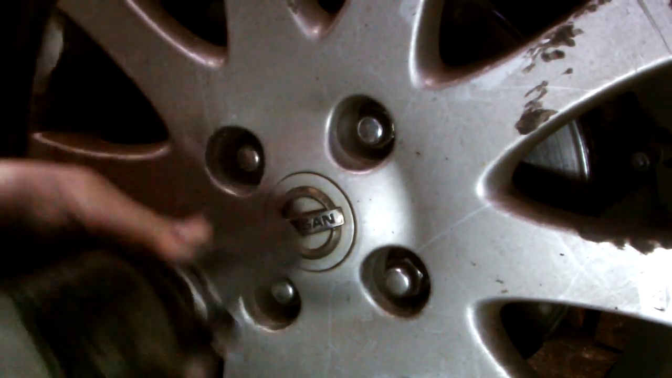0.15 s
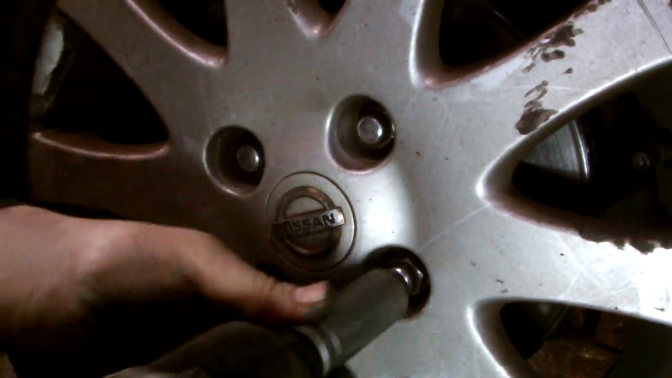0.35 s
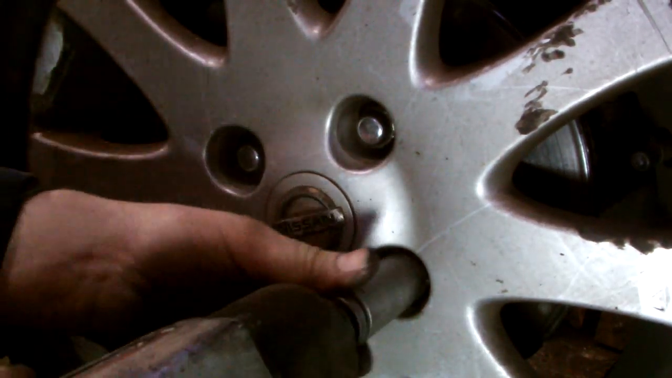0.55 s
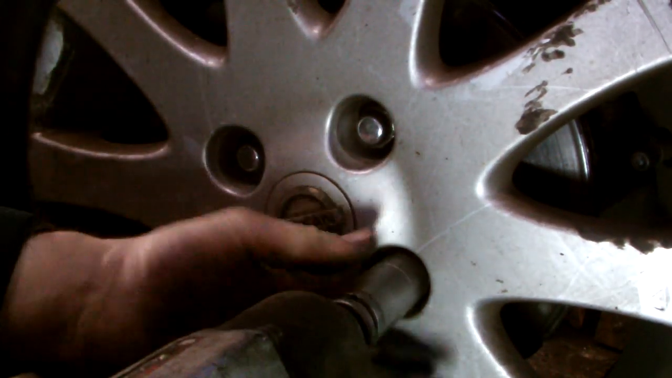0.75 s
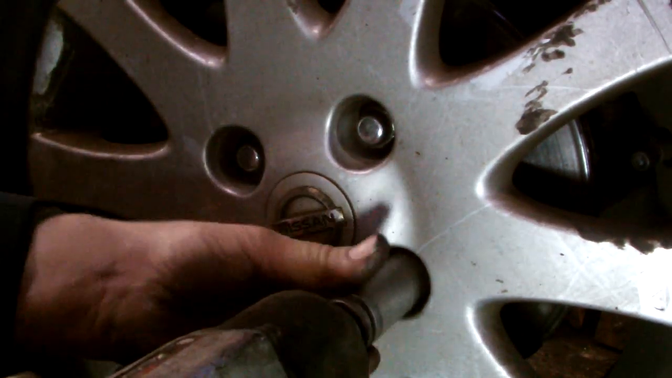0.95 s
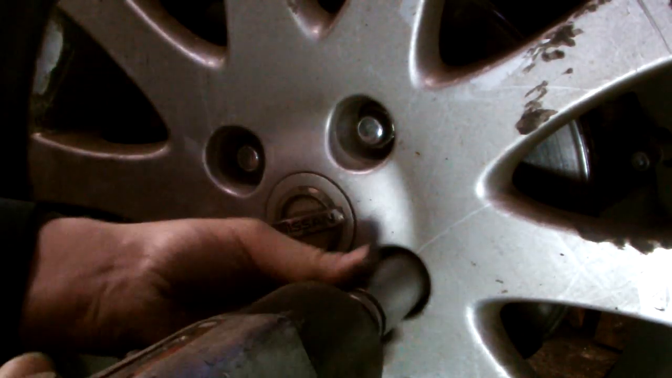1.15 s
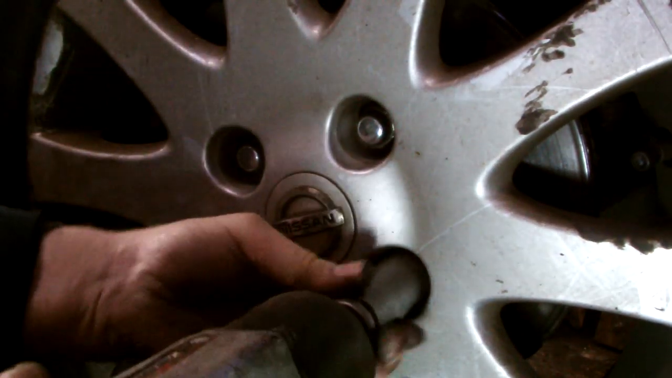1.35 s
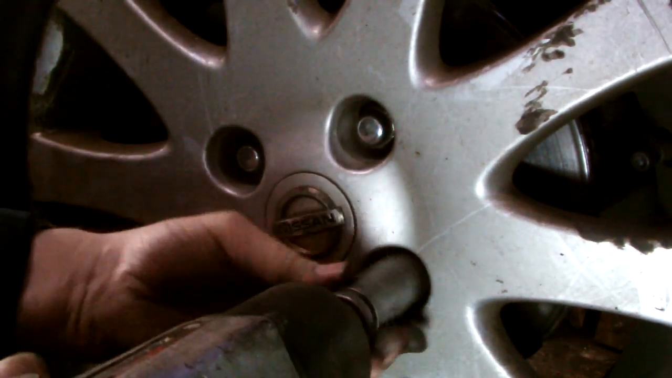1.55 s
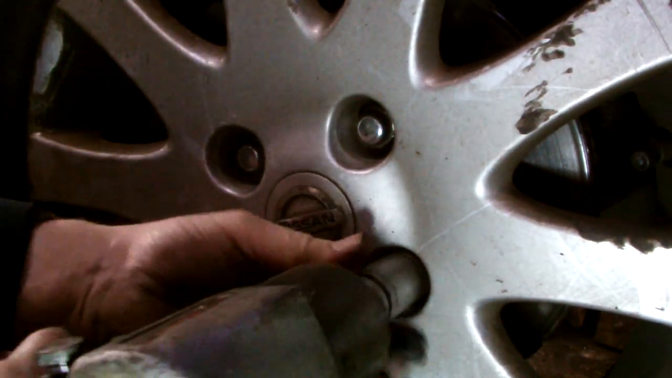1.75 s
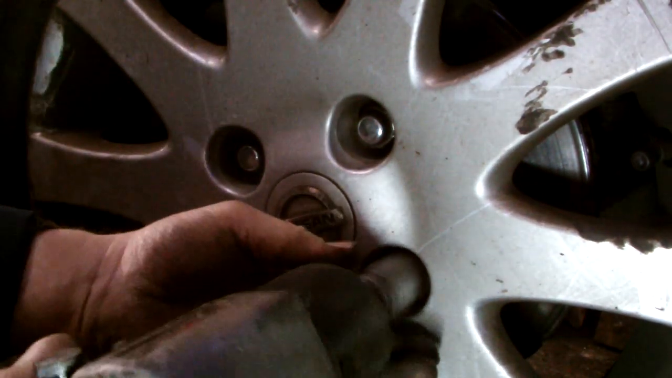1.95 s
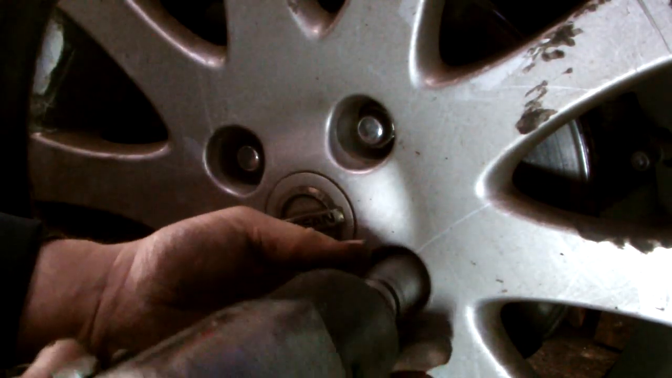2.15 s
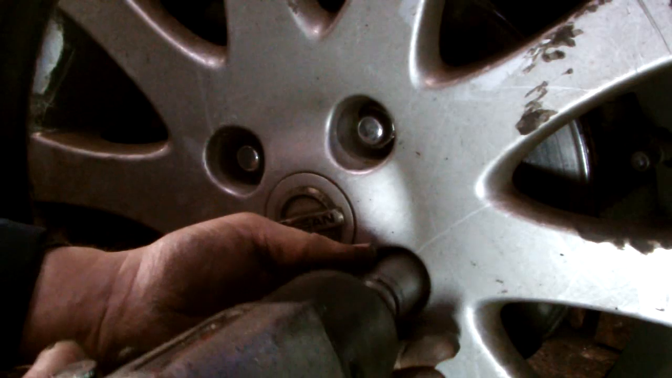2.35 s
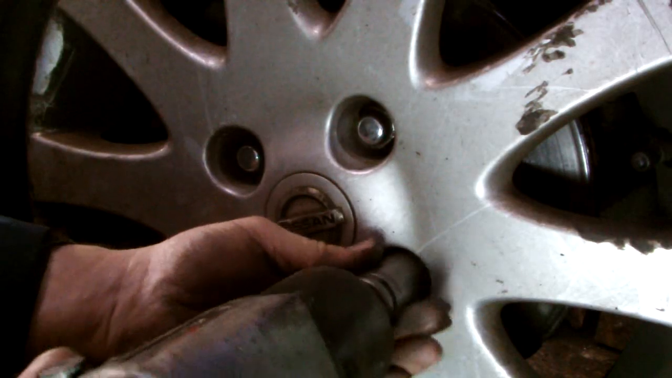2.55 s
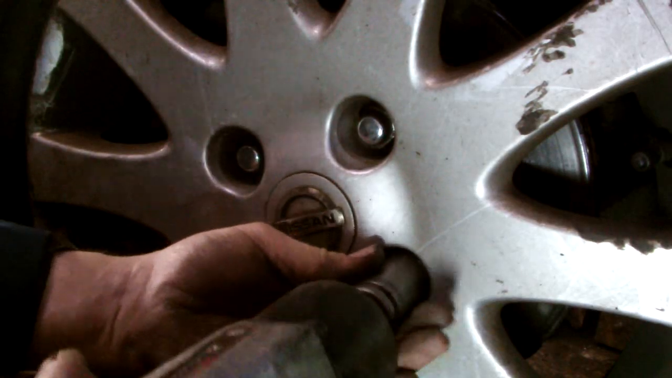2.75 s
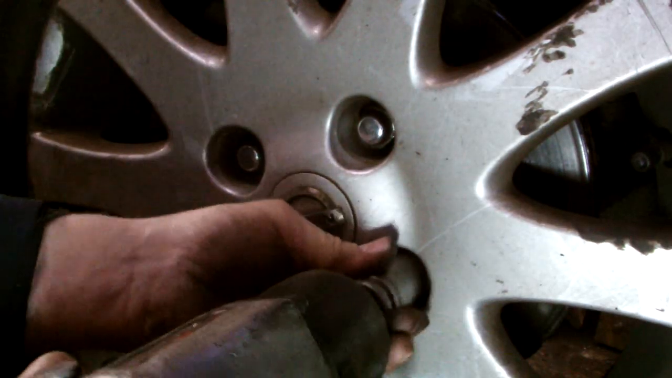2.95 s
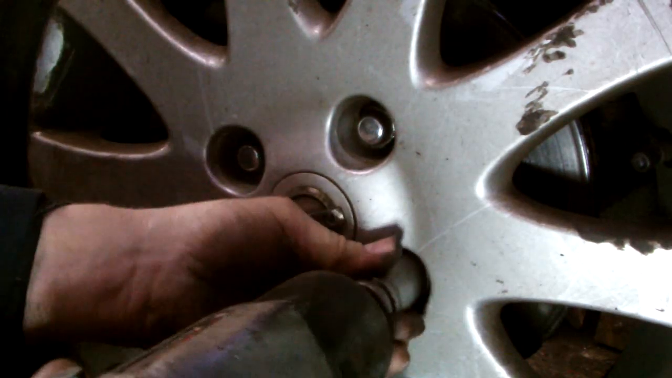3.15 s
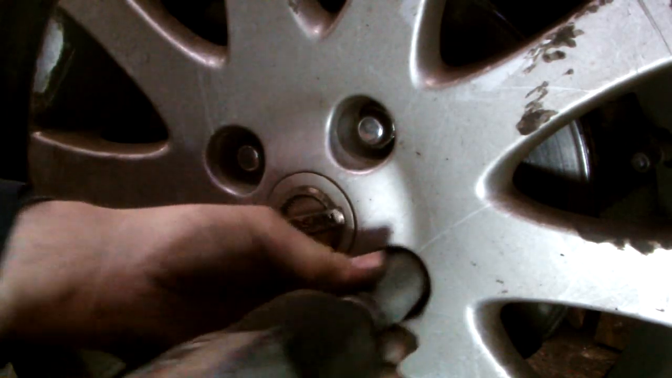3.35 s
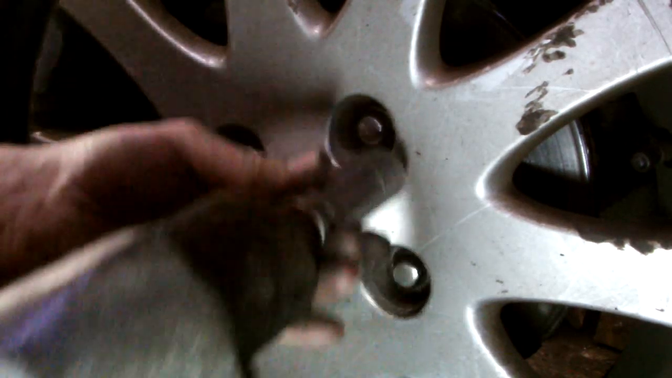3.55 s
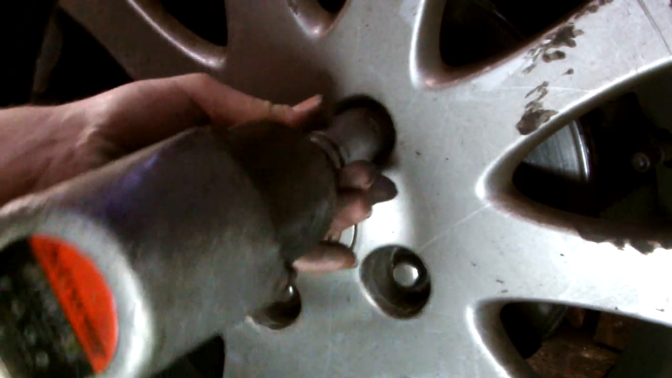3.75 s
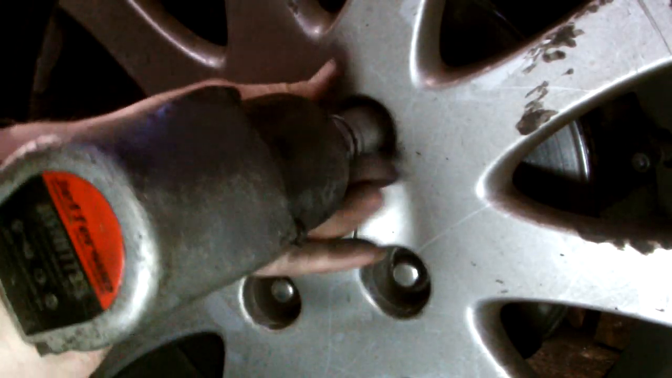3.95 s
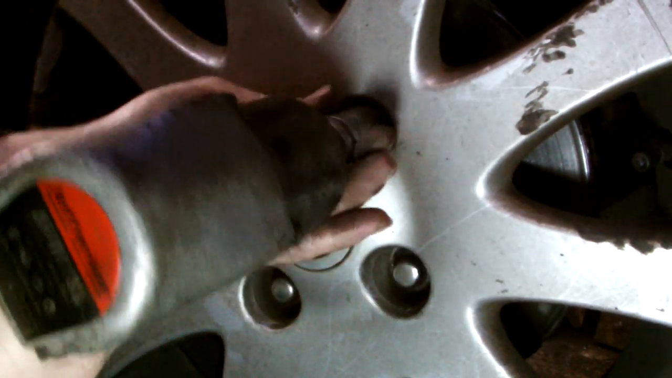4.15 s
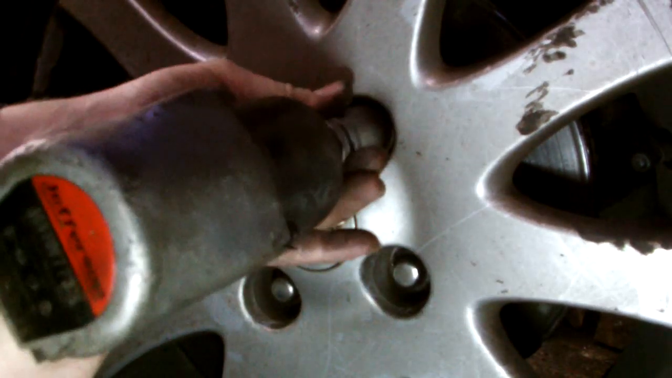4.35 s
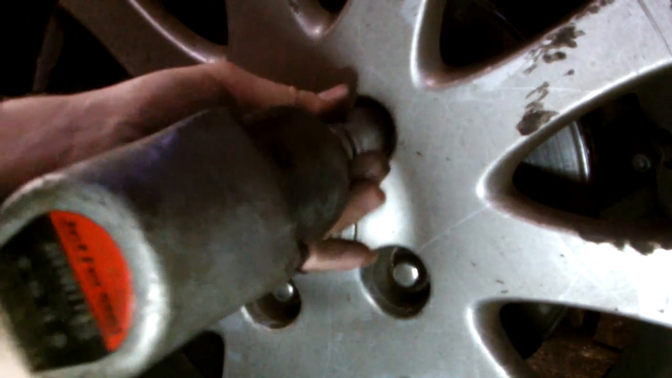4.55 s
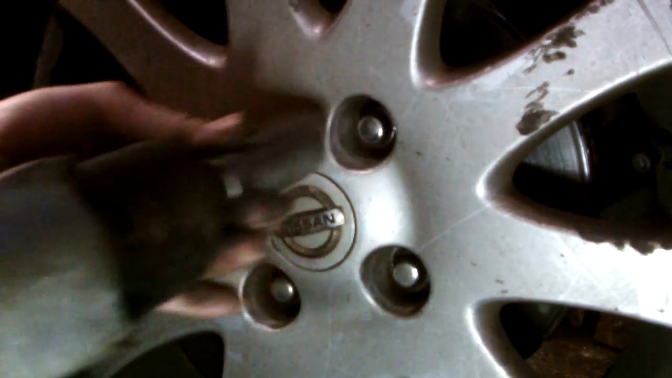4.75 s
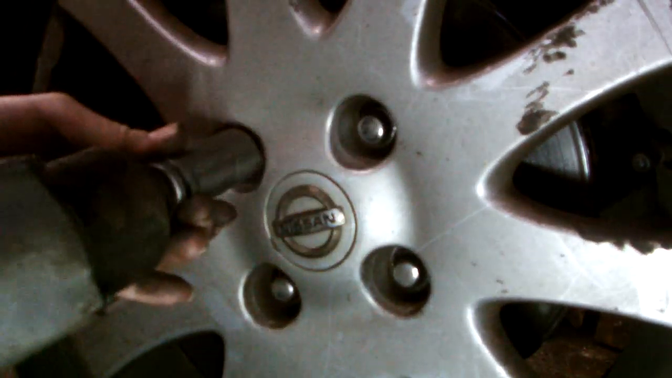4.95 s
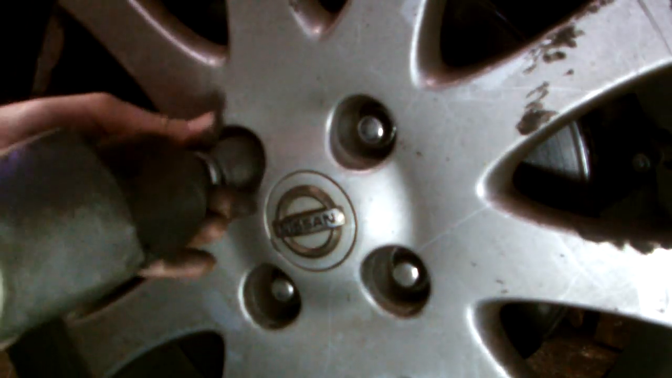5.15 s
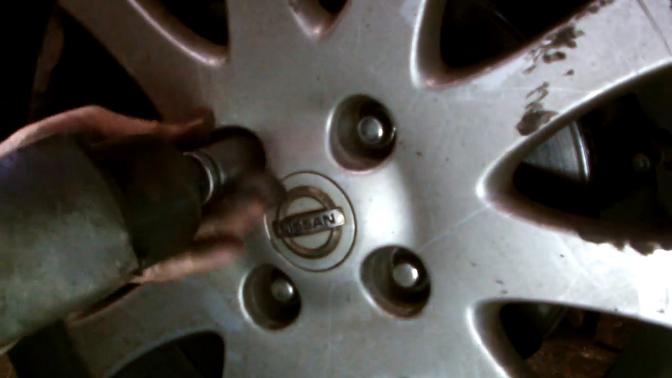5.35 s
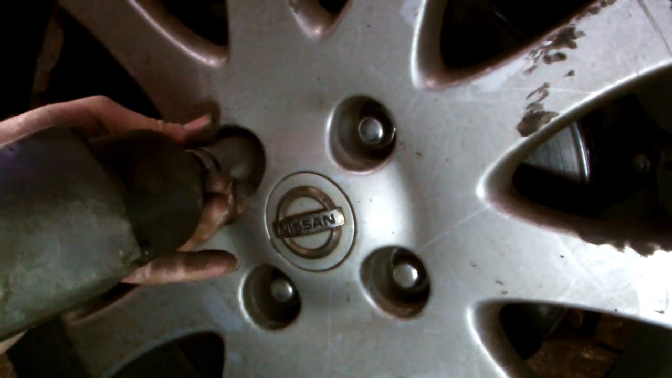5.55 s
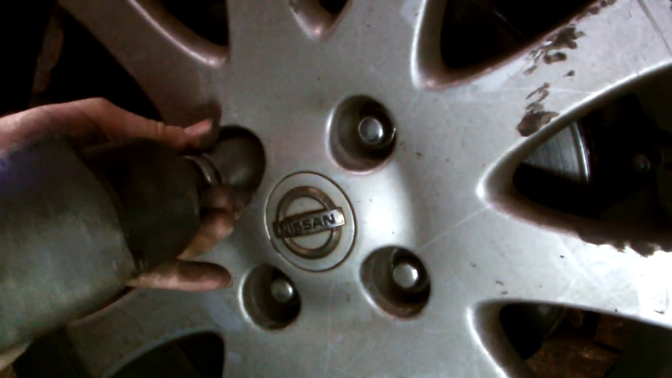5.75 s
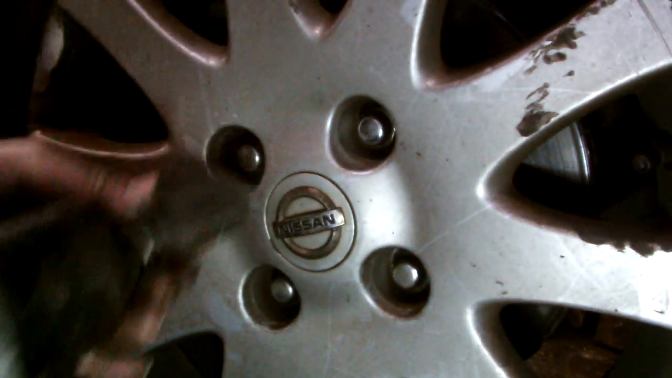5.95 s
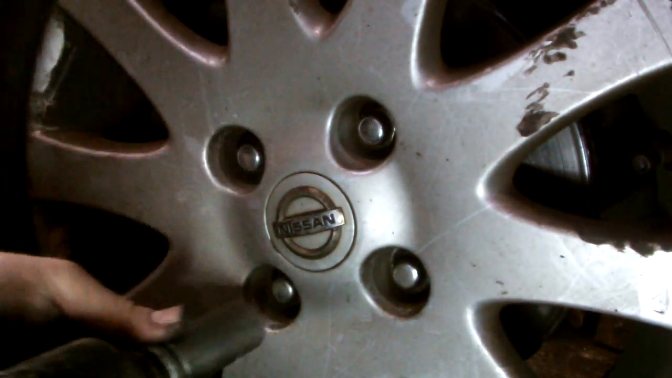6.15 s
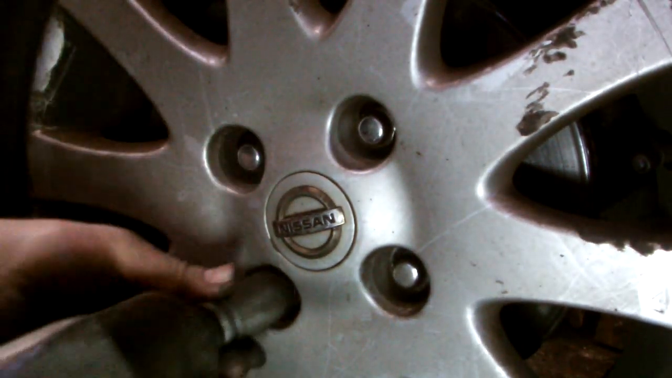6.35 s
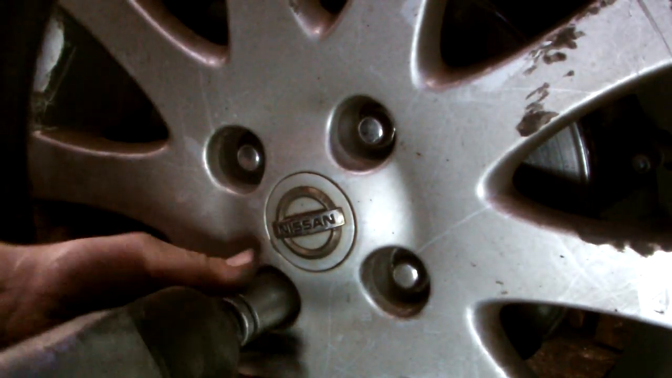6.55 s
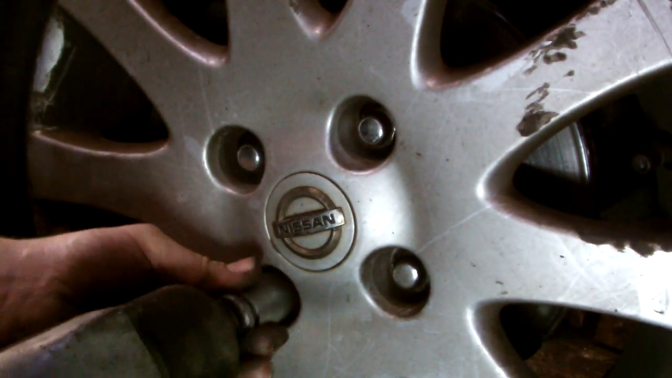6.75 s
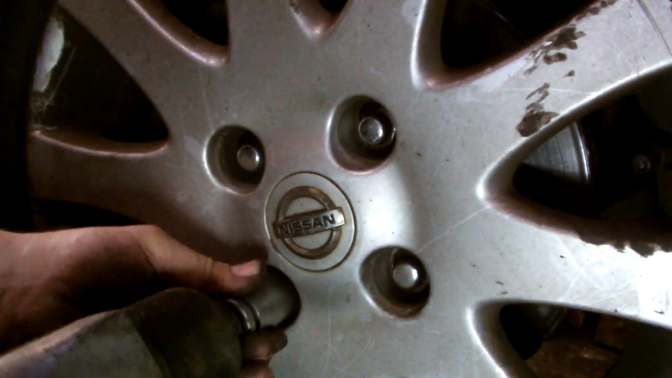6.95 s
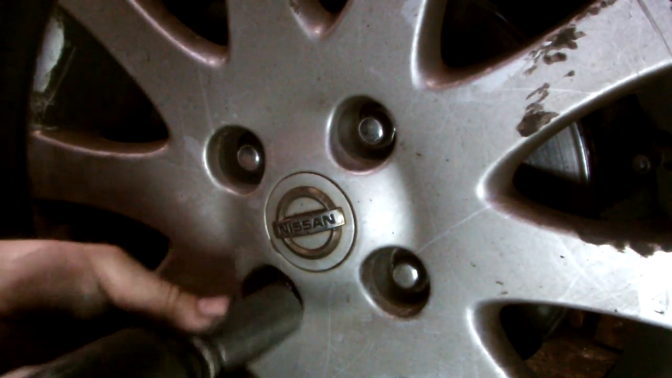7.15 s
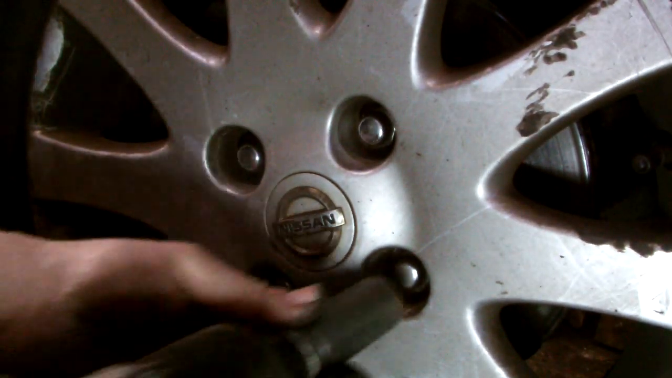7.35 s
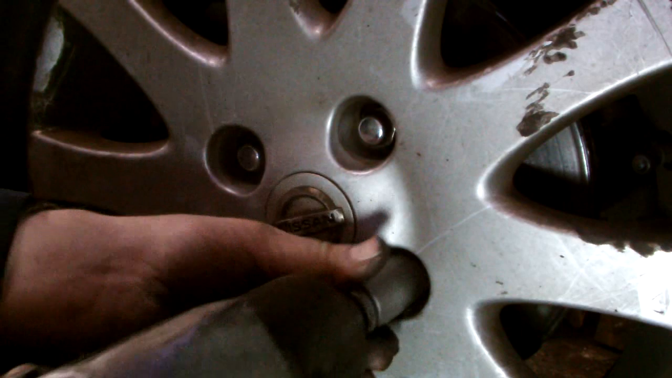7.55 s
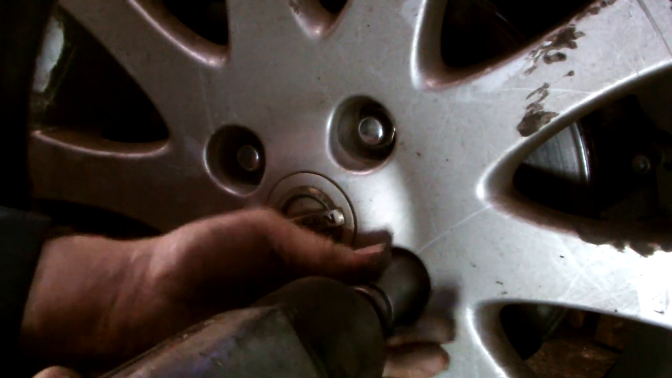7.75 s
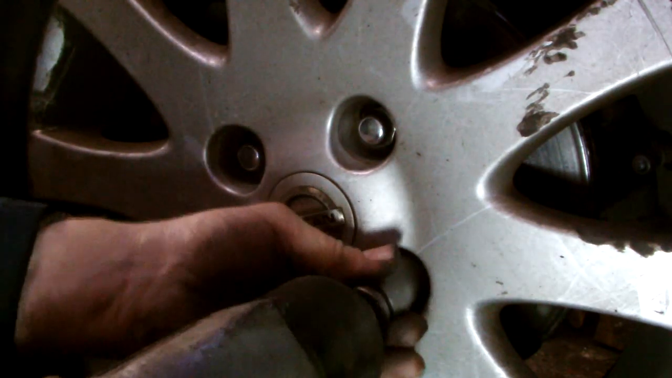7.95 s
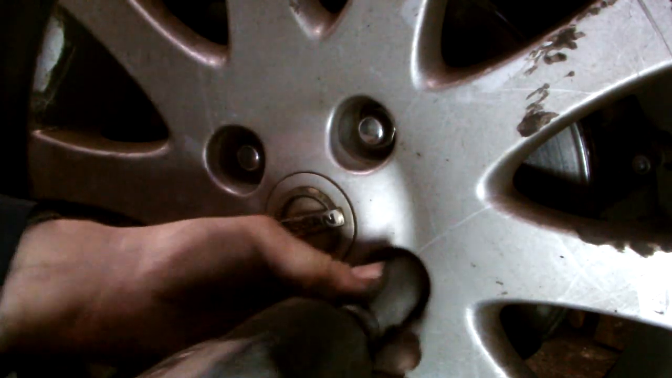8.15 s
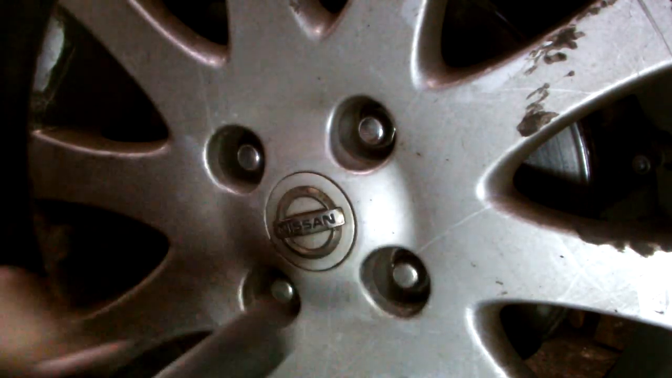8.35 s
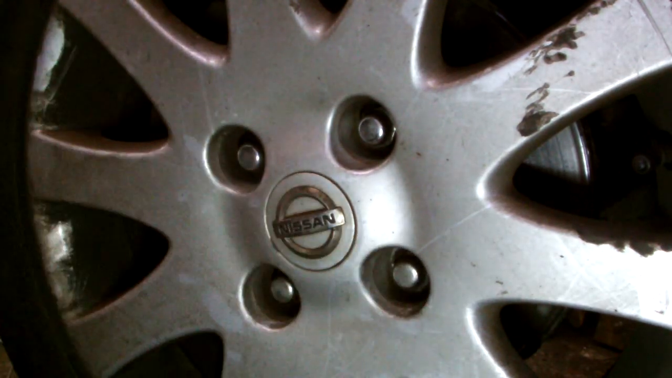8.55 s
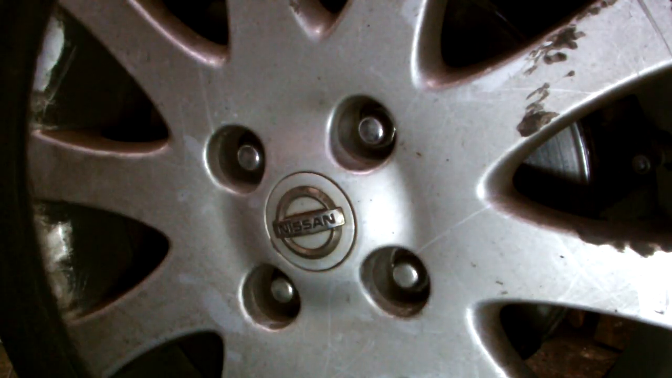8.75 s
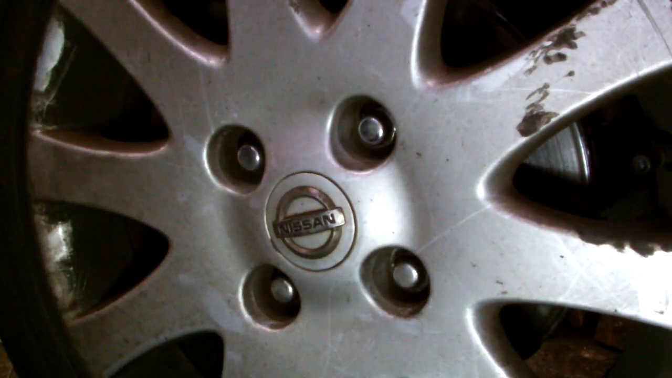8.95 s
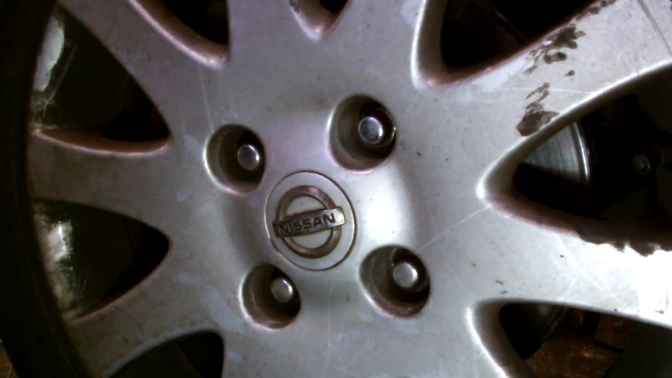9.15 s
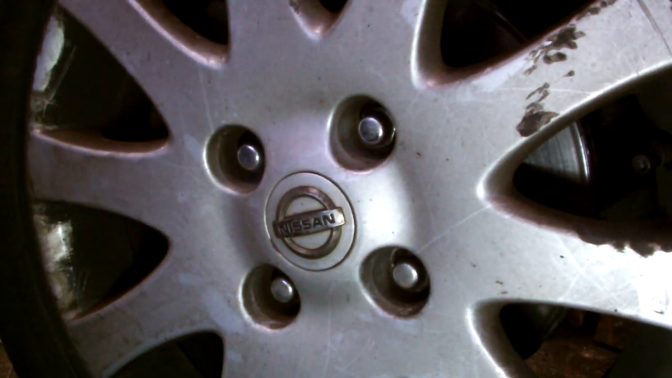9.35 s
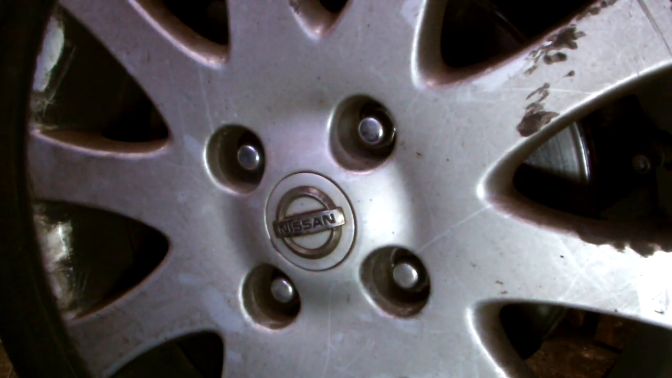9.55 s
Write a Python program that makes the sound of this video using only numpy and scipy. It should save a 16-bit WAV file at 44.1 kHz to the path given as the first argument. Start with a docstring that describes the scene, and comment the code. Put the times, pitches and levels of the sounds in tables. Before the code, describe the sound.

Close up in a hard-walled garage, the ring of an earlier burst dies away over a light metallic slip. From 0.5 s the socket knocks softly on a wheel nut, with thin air leak and dull hand scuffs. At 1.9 s comes a firm clack and two tiny puffs of the air wrench; from 2.2 to 3.3 s three bursts follow, first whirring up briefly, then hammering steel at about seventeen blows a second amid bright hiss and chatter. Clacks at 3.8-4.0 s lead to another burst at 4.2-4.55 s. The pattern repeats: knocks near 5.2 s, burst 5.5-5.8; knocks near 6.5, burst 6.8-7.0; knocks near 7.6, burst 7.9-8.1. Each of these four opens with a sharp howling rush of air and ends abruptly, echoing. After 8.5 s only faint taps, a scuff and a wavering air hiss remain over quiet workshop noise.

```python
"""A hard-walled garage, microphone close to a pneumatic impact wrench tightening the nuts of an alloy car wheel.
Knocks and clinks: short noise bursts and decaying steel modes, as the socket finds each nut.
Wrench: vane puffs and filtered hiss from the air motor; steel cracks about 17 times a second once a nut is
tight; ticks and squeaks of the loose socket between. Softer: filtered noise for the air leak, the wheel's
rumble, the hand and the workshop. Decaying noise makes the room ring on."""
import sys
import numpy as np
from scipy import signal
from scipy.fft import rfft, irfft
from scipy.io import wavfile

SR = 44100
rng = np.random.default_rng(int(sys.argv[2]) if len(sys.argv) > 2 else 0)


def inscribe(sig):
    """Save sig as 16-bit PCM at rate SR to the path in sys.argv[1].

    A 1-D sig is mono; a 2-D sig holds one channel per row.
    Samples are clipped to [-1, 1] before scaling.
    """
    pcm = np.round(np.clip(np.atleast_2d(sig).T, -1, 1) * 32767)
    wavfile.write(sys.argv[1], SR, pcm.astype(np.int16))


N = 424241
TIME = np.arange(N) / SR


def undb(db):
    """Decibels to gain."""
    return 10 ** (np.asarray(db) / 20)


def unit(x):
    """Scale to rms 1."""
    return x / np.sqrt(np.mean(x ** 2))


def along(points, hz):
    """Read (f/Hz, value) points on a log-frequency axis."""
    f, value = np.transpose(points)
    return np.interp(np.log(hz + 1), np.log(f), value)


def colour(x, points):
    """Causal filter with the given spectrum, made from the cepstrum of its log gain."""
    size = 2048
    gain = undb(along(points, np.fft.rfftfreq(size, 1 / SR)))
    cepstrum = irfft(np.log(gain))
    # folding the cepstrum onto positive time makes the filter minimum-phase
    cepstrum[1:size // 2] *= 2
    cepstrum[size // 2 + 1:] = 0
    impulse = irfft(np.exp(rfft(cepstrum)))
    return signal.fftconvolve(x, impulse)[:len(x)]


def noise(points):
    """Noise of rms 1 with the given spectrum."""
    return unit(colour(rng.standard_normal(N), points))


def walk(rate):
    """Random wander of rms 1, drawn as straight lines between `rate` points per second."""
    return unit(np.interp(TIME * rate, np.arange(N), rng.standard_normal(N)))


def add(out, s, x):
    """Mix x into out at time s."""
    i = max(int(s * SR), 0)
    out[i:i + len(x)] += x[:max(N - i, 0)]


def resonance(x, hz, width):
    """Band-pass with gain 1 at the centre."""
    return signal.lfilter(*signal.iirpeak(hz, hz / width, fs=SR), x)


def narrow_band(x, hz, width):
    """Two equal resonances in series, scaled to rms 1."""
    return unit(resonance(resonance(x, hz, width), hz, width))


def swell(s, length):
    """A smooth rise and fall around time s, down to 1/e half a length away."""
    return np.exp(-np.minimum((2 * (TIME - s) / length) ** 2, 50))


def crack(points, t60, tail_db, tail_t60, snap=0):
    """A hard contact: one snap, a dense noise burst and a weaker tail; as strong as 2 ms at rms 1."""
    t = TIME[:SR // 5]
    decay = undb(-60 * t / t60) + undb(tail_db - 60 * t / tail_t60)
    burst = rng.standard_normal(len(t)) * decay
    burst[0] += snap
    x = colour(burst, points)
    # the first 10 ms set the strength
    return x / np.sqrt(np.sum(x[:SR // 100] ** 2) / (SR / 500))


# steel modes of socket, nut and rim: nominal f/Hz, relative level/dB, t60/s
STEEL_MODES = [(319, -25, .06), (1236, -17.5, 0.03), (1483, -12.5, 0.053), (1700, -18, 0.11),
               (2597, -20, .05), (3025, -18.5, 0.067), (3280, -9.5, 0.032), (4207, -6, .04),
               (4090, -9, 0.048), (7390, -2.5, 0.022), (8750, -0.5, 0.023), (10020, -3, 0.021),
               (12100, -5, .03)]


def ring():
    """Modes of the steel parts; every contact excites them in a different mix."""
    t = TIME[:SR // 5]
    hz, db, t60 = np.transpose(STEEL_MODES)[:, :, None]
    size, detune = rng.uniform(-0.99, 1, (2, len(STEEL_MODES), 1))
    modes = np.sin(2 * np.pi * hz * (1 + .012 * detune) * t)
    return np.sum(size * undb(db - 60 * t / t60) * modes, axis=0)


# spectrum of the room's ringing after a burst: f/Hz, relative level/dB per Hz
AFTERSOUND_SPECTRUM = [(60, -19), (200, -7.5), (700, 0.5), (1500, 1), (4200, -0.5), (6500, -9), (10000, -8),
                       (15000, -28)]
AFTERSOUND_DB, AFTERSOUND_T60_S = -44, 0.88


def aftersound():
    """The tail of an earlier burst dies away in the room."""
    mid = noise(AFTERSOUND_SPECTRUM)
    side = noise(AFTERSOUND_SPECTRUM) * undb(-9)
    decay = np.exp(-np.log(1000) * TIME / AFTERSOUND_T60_S)
    return np.array([mid + side, mid - side]) * undb(AFTERSOUND_DB) * decay


# spectrum of the workshop noise: f/Hz, relative level/dB per Hz
SHOP_SPECTRUM = [(30, -23.5), (80, -17.5), (170, 5), (280, -3), (650, 5.5), (1300, 4), (4000, 0.5),
                 (7000, -14), (15000, -11)]


def workshop(level_db=-67.5):
    """Faint steady noise of the workshop."""
    return undb(level_db) * noise(SHOP_SPECTRUM)


# spectra of the leak's high hiss and its lower rush: f/Hz, relative level/dB per Hz
HISS_SPECTRUM = [(200, -22), (1000, -14), (4200, -24.5), (6000, -13.5), (8000, -5.5), (10500, -1.5),
                 (12500, 0.5), (15000, -6.5)]
RUSH_SPECTRUM = [(300, -18), (1400, -7), (2200, -3), (3000, -4), (4200, -2), (5500, -9.5), (12000, -21)]
# wrench pressed onto a nut, bending the hose: seated t/s, eased off t/s, relative leak level/dB
NUT_PRESSES = [(0.565, 2.0, -52), (3.972, 4.503, -49.5), (5.243, 5.795, -50), (6.543, 7.0, -53),
               (7.652, 8.103, -54.5)]
# leak while the wrench is lowered at the end: t/s, relative hiss level/dB, relative rush level/dB
LOWERING_LEAK = [(8.55, -70, -74), (8.66, -55.5, -61), (8.86, -51.5, -58), (9.08, -54.5, -55.5),
                 (9.19, -62, -60), (9.34, -51.5, -58.5), (9.47, -46.5, -47.5), (9.62, -48.5, -49.5)]
# rise time, 1/e fall time, floor of the leak
LEAK_OPEN_S, LEAK_SHUT_S, IDLE_LEAK_DB = 0.078, .08, -65


def leak(hiss_db=0, rush_db=-4, pressed_rush_db=-5, idle_rush_db=1):
    """Air seeps at the hose coupling; it opens up while the wrench is pressed on a nut and as it is lowered."""
    pressed = np.zeros(N)
    for on, off, db in NUT_PRESSES:
        opening = np.clip((TIME - on) / LEAK_OPEN_S, 0, 1)
        closing = np.exp(-np.maximum(TIME - off, 0) / LEAK_SHUT_S)
        pressed += undb(db) * opening * closing
    s, high_db, low_db = np.transpose(LOWERING_LEAK)
    high = np.maximum(pressed, undb(IDLE_LEAK_DB))
    high = high + undb(np.interp(TIME, s, high_db, left=-np.inf))
    low = np.maximum(pressed * undb(pressed_rush_db), undb(IDLE_LEAK_DB + idle_rush_db))
    low = low + undb(np.interp(TIME, s, low_db, left=-np.inf))
    hiss = noise(HISS_SPECTRUM) * high * undb(hiss_db + 1.4 * walk(23))
    rush = noise(RUSH_SPECTRUM) * low * undb(rush_db + 0.47 * walk(23))
    return hiss + rush


# socket knocking on rim and nut as it finds its seat, with one loud trigger click at 1.903 s: t/s, relative
# level/dB, clink level re knock/dB, clack pitch f/Hz
SEAT_KNOCKS = [(0.543, -32, -1, 5000), (0.5889, -29, -7.5, 1840), (1.289, -32.5, 2, 1560),
               (1.724, -38, 6, 1820), (1.9032, -21.5, -10, 1480), (3.802, -32, -13, 3200),
               (3.867, -31, -16, 2340), (3.8771, -22.5, -7.5, 2400), (4.026, -15, -7.5, 1340),
               (5.131, -34.5, -26.5, 1740), (5.1933, -28, -16, 1820), (5.218, -30, -3, 1540),
               (5.2632, -15.5, -2.5, 1640), (5.2746, -32, 9.5, 1710), (6.426, -34.5, -24.5, 2110),
               (6.4966, -26, -6.5, 1740), (6.51, -24, -3, 3700), (6.578, -14.5, -2.5, 3200),
               (7.5568, -42.5, -23, 1180), (7.5963, -32, -1, 3190), (7.6007, -16, -4, 3160),
               (7.644, -26.5, -11, 4240), (7.6968, -17, -4.5, 3160), (8.584, -48, -17, 1415),
               (9.0063, -41, -15, 1030), (9.1377, -46, -19, 2030)]
# only the socket's edge touches, mostly as it slips off a nut: t/s, relative level/dB
EDGE_SLIPS = [(0.0014, -24.5), (0.0562, -40), (0.9458, -40.5), (1.4476, -39.5), (2.514, -22.5),
              (2.802, -21), (3.5058, -44.5), (3.9184, -27), (4.649, -30.5), (5.9633, -38.5),
              (7.0753, -20.5), (8.463, -54.5)]
SLIP_HZ, SLIP_THUD_DB, SLIP_CLINK_DB = 4230, -14, 5.5
# harder knocks move the wheel more: relative thud of a knock of FIRM_DB, and its loss for each dB less
FIRM_DB, THUD_DB, THUD_DB_PER_DB = -12.5, -5.5, 0.54
# light taps while the socket feels for a nut: longest lead, mean level and spread, base pitch, clink
TAP_SPREAD_S, TAP_DB, TAP_SCATTER_DB, TAP_HZ, TAP_CLINK_DB = .1, -39, 3, 1700, -8
# the trigger clicks just before the valve opens
TRIGGER_LEAD_S, TRIGGER_DB, TRIGGER_CLINK_DB, TRIGGER_HZ = .034, -40, 0, 1820
# after a contact the socket drops back once, more softly: mean delay, level re contact
REBOUND_S, REBOUND_DB = 0.01, -16


def contacts(count=2):
    """Knocks, taps, trigger clicks and slips as (t/s, level, thud, clink/dB, f/Hz), each with its rebound."""
    taps = []
    for on, _, _ in NUT_PRESSES[1:]:
        for _ in range(count):
            s = on - TAP_SPREAD_S * rng.uniform(0, 1)
            db = TAP_DB + TAP_SCATTER_DB * rng.standard_normal()
            taps.append((s, db, TAP_CLINK_DB, TAP_HZ * 2 ** rng.uniform(-.5, 0.31)))
    # only pulls made while pressed on a nut get a click
    clicks = [(pull[0] - TRIGGER_LEAD_S, TRIGGER_DB, TRIGGER_CLINK_DB, TRIGGER_HZ)
              for pull in TRIGGER_PULLS if any(on < pull[0] < off for on, off, _ in NUT_PRESSES)]
    knocks = [(s, db, THUD_DB + THUD_DB_PER_DB * (db - FIRM_DB), clink_db, hz)
              for s, db, clink_db, hz in SEAT_KNOCKS + taps + clicks]
    slips = [(s, db, SLIP_THUD_DB, SLIP_CLINK_DB, SLIP_HZ) for s, db in EDGE_SLIPS]
    first = knocks + slips
    rebounds = [(s + REBOUND_S * rng.uniform(.7, 1.3), db + REBOUND_DB, *tone) for s, db, *tone in first]
    return first + rebounds


# spectra of wheel thud, tool clack and edge clink: f/Hz, relative level/dB per Hz
THUD_SPECTRUM = [(40, -37.5), (150, -16.5), (300, 0), (450, 0.5), (650, 4), (900, -11.5), (1600, -31.5),
                 (4000, -49)]
CLACK_SPECTRUM = [(400, -21), (900, -2), (1500, -2), (2100, -1), (3400, -3), (4300, -1.5), (4900, -9.5),
                  (6500, -15), (12000, -28.5)]
CLINK_SPECTRUM = [(3000, -26), (6000, -7.5), (7500, -4), (8200, -1), (10200, -1), (11500, -3.5),
                  (13000, -5), (15500, -20.5)]


def socket(thud_db=1, clack_db=-2, tone_db=1, clink_db=0, ring_db=-15, tone_width=0.18):
    """Socket meets nut: the wheel thuds, the tool clacks at the contact point's pitch, the steel edge clinks."""
    out = np.zeros(N)
    for s, db, low_db, high_db, hz in contacts():
        thud = crack(THUD_SPECTRUM, t60=0.033, tail_db=-12.5, tail_t60=0.19, snap=8)
        clack = crack(CLACK_SPECTRUM, t60=0.0052, tail_db=-9.5, tail_t60=0.067, snap=3.2)
        tone = resonance(clack, hz, tone_width * hz)
        clink = crack(CLINK_SPECTRUM, t60=0.013, tail_db=-18, tail_t60=.05)
        add(out, s, undb(db + low_db + thud_db) * thud)
        add(out, s, undb(db) * (undb(clack_db) * clack + undb(tone_db) * tone))
        add(out, s, undb(db + high_db + clink_db) * clink)
        add(out, s, undb(db + ring_db) * ring())
    return out


def uneven_grain():
    """White noise whose level wanders, as of rough surfaces moving on each other."""
    return rng.standard_normal(N) * undb(3.3 * walk(60))


def wheel_rumble(hz=192, length_s=0.16, lag_s=0.093, level_db=-42, width=0.83):
    """Low rumble of the wheel after each knock, as the socket turns the nut; its level follows the knock."""
    level = sum(undb(db + level_db) * swell(s + lag_s, length_s) for s, db, _, _ in SEAT_KNOCKS)
    return level * narrow_band(uneven_grain(), hz, width * hz)


# the hand shifts its grip: t/s, length/s, centre f/Hz, level/dB
GRIP_SCUFFS = [(0.655, 0.17, 680, -59), (1.046, 0.12, 560, -56.5), (1.07, 0.18, 212, -62.5),
               (1.52, 0.079, 480, -56.5), (1.565, 0.088, 190, -61.5), (1.757, 0.053, 1880, -45.5),
               (9.035, 0.076, 700, -56)]


def hand(width=0.83):
    """Dull uneven scuffs as the grip shifts: grainy noise in broad bands."""
    grain = uneven_grain()
    out = np.zeros(N)
    for s, length, hz, db in GRIP_SCUFFS:
        out += undb(db) * swell(s, length) * narrow_band(grain, hz, width * hz)
    return out


# narrow airy whistles around the tool: t/s, length/s, centre f/Hz, level/dB
AIRY_WHISTLES = [(1.066, 0.14, 3370, -55.5), (2.05, 0.12, 1277, -36), (4.124, 0.25, 1577, -53.5),
                 (5.362, 0.32, 1816, -52)]


def whistles(width=0.13):
    """Airy bands of pitch that come and go, cut from one noise by narrow resonances."""
    air = rng.standard_normal(N)
    out = np.zeros(N)
    for s, length, hz, db in AIRY_WHISTLES:
        out += undb(db) * swell(s, length) * narrow_band(air, hz, width * hz)
    return out


# trigger pulls: open t/s, shut t/s, relative exhaust level/dB, level change at the start/dB
TRIGGER_PULLS = [(1.939, 1.988, -23.5, 1.5), (2.017, 2.045, -29, -6.5), (2.23, 2.465, -31, 0),
                 (2.54, 2.754, -28.5, -4.5), (2.923, 3.3, -32.5, 1.5), (4.209, 4.55, -30.5, 11.5),
                 (5.49, 5.835, -34.5, 14), (6.781, 7.02, -31, 11), (7.881, 8.117, -33, 14.5)]


def throttle(open_s=0.018, shut_s=.014, surge_s=0.11):
    """Valve opening and air flow: each flow starts above or below its loaded level, then settles to it."""
    valve, flow = np.zeros(N), np.zeros(N)
    for on, off, db, surge_db in TRIGGER_PULLS:
        age = np.maximum(TIME - on, 0)
        closing = np.exp(-np.maximum(TIME - off, 0) / shut_s)
        gate = np.minimum(age / open_s, 1) ** 2 * closing
        valve += gate * undb(db)
        flow += gate * undb(db + surge_db * np.exp(-(age / surge_s) ** 2))
    return valve, flow


# spectra of exhaust hiss and vane puff: f/Hz, relative level/dB per Hz
EXHAUST_SPECTRUM = [(40, -45), (150, -27), (400, -7), (1000, -8.5), (1400, -5.5), (2700, -3.5), (4100, -3),
                    (5000, -5), (6700, -7.5), (9000, -3.5), (11500, -1.5), (13500, -3.5), (15200, -16)]
PUFF_SPECTRUM = [(30, -32), (100, -16.5), (200, -15.5), (360, 9.5), (450, -5.5), (560, -3.5), (900, 1),
                 (1400, -12), (3000, -9.5), (9000, -48.5)]
# resonances of the exhaust passages: f/Hz, width/Hz, relative level/dB
EXHAUST_PASSAGES = [(1292, 150, -10.5), (1765, 98, -21.5), (2600, 120, -4.5), (3850, 210, -3.5),
                    (10400, 180, -8.5), (11300, 350, -1)]


def motor(valve, flow, strikes, top_hz=226, recover_s=.012, load_s=0.05, puff_db=0.2, air_db=3.5, throb=0.17):
    """Blows stall the rotor; as it speeds up again its vanes let out growing puffs over the exhaust hiss."""
    times = np.array(strikes)[:, 0]
    # a blow close behind another causes no new stall
    spaced = times[np.diff(times, prepend=0) > .045]
    starts = np.array(TRIGGER_PULLS)[:, 0]
    stalls = np.sort(np.r_[0, spaced + .003, starts - .02])
    age = TIME - stalls[np.searchsorted(stalls, TIME, side="right") - 1]
    vane_hz = top_hz * (1 - .6 * np.exp(-age / recover_s)) * (1 + .04 * walk(120))
    turns = np.cumsum(vane_hz) / SR
    pulses = np.diff(np.floor(turns), prepend=0) * undb(2 * walk(200))
    puffs = unit(colour(pulses, PUFF_SPECTRUM)) + 0.63 * noise(PUFF_SPECTRUM)
    # the puffs weaken again when the rotor meets no resistance
    push = (0.083 + 1 - np.exp(-(age / load_s) ** 2)) / (1 + (age / 0.063) ** 6)
    jet = noise(EXHAUST_SPECTRUM)
    jet = unit(jet + sum(undb(db) * resonance(jet, hz, width) for hz, width, db in EXHAUST_PASSAGES))
    turbulence = undb(1.3 * walk(220))
    hiss = jet * (1 + throb * np.cos(2 * np.pi * turns)) * turbulence
    return undb(puff_db) * puffs * push * np.sqrt(valve * flow) + undb(air_db) * hiss * flow


# howl of the exhaust as the valve opens: nominal f/Hz, width/Hz, relative level/dB
INRUSH_HOWL = [(1360, 150, -0.5), (1730, 470, -3.5), (2480, 89, -2.5), (3520, 370, -14.5),
               (3880, 294, -2.5)]


def inrush(flow, howl_db=-4, fade_s=0.042):
    """The first rush of air into the standing motor howls in the exhaust ports, differently on every pull."""
    out, t = np.zeros(N), TIME[:SR // 5]
    for on, _, _, _ in TRIGGER_PULLS:
        shift = 1 + .04 * rng.uniform(-1.1, 1, len(INRUSH_HOWL))
        howl = np.zeros(len(t))
        for (hz, width, db), k in zip(INRUSH_HOWL, shift):
            howl += undb(db) * unit(resonance(rng.standard_normal(len(t)), hz * k, width))
        add(out, on, howl * np.exp(-(t / fade_s) ** 2))
    return undb(howl_db) * out * flow


# the socket bounces after every blow: nominal delay/s, relative level/dB
SOCKET_BOUNCES = [(.017, -2), (.034, 2.5), (.042, -1)]
# spectrum of the chatter ticks: f/Hz, relative level/dB per Hz
CHATTER_SPECTRUM = [(1000, -26), (4000, -15), (6500, -18.5), (8300, 4), (9300, 3), (10300, 0.5), (11300, 1),
                    (13000, -8.5), (15500, -20.5)]


def chatter(valve, flow, strikes, tick_db=5, ping_db=10, ping_hz=9350, ping_s=0.0013, ring_db=4):
    """The loose socket rattles at run-down and after each blow: ticks with a squeak of steel on steel."""
    out, t = np.zeros(N), TIME[:SR // 100]
    ticks = [(blow[0] + delay, db) for blow in strikes for delay, db in SOCKET_BOUNCES]
    for s, db in ticks:
        late, size, pitch = rng.uniform(-0.7, 1, 3)
        s, gain = s + .002 * late, undb(db + 3.5 * size)
        swell_and_fade = t / ping_s * np.exp(1 - t / ping_s)
        ping = np.sin(2 * np.pi * ping_hz * (1 + .09 * pitch) * t) * swell_and_fade
        tick = crack(CHATTER_SPECTRUM, t60=.015, tail_db=-18, tail_t60=.04)
        add(out, s, gain * undb(tick_db) * tick)
        add(out, s, gain * undb(ping_db) * ping)
    # the fast spinning socket keeps the steel ringing while the flow surges
    jangle = np.zeros(N)
    for pull in TRIGGER_PULLS:
        for delay in np.arange(0, .08, .012):
            add(jangle, pull[0] + delay, ring())
    return out * np.sqrt(valve * flow) + undb(ring_db) * jangle * np.maximum(flow - valve, 0)


# steady hammering once a nut is tight:
# first blow t/s, last blow t/s, count, relative level/dB, mean clack of the housing re blow/dB
HAMMER_RUNS = [(2.6027, 2.7296, 3, -9, -3), (2.985, 3.288, 6, -8, -9.5), (4.2947, 4.5361, 5, -6.5, -8),
               (5.567, 5.8148, 5, -8, -22.5), (6.8663, 6.9887, 3, -5.5, -7.5),
               (7.952, 8.1238, 4, -9.5, -15)]
FADE_DB_PER_BLOW, CLACK_SCATTER_DB = 0.84, 4
# the hammer catches on tight spots, mostly while the nut runs down: t/s, relative level/dB
HAMMER_CATCHES = [(1.952, -10.5), (1.9775, -6), (1.9855, -14), (1.997, -12), (2.027, -17), (2.2515, -17),
                  (2.2751, -11.5), (2.2974, -9.5), (2.4309, -15), (2.4668, -15), (2.4737, -15),
                  (2.5607, -12.5), (2.576, -9.5), (2.5832, -10), (2.7634, -10), (2.9643, -8.5),
                  (4.2398, -11), (4.2546, -14.5), (5.5104, -7), (5.539, -7), (6.8111, -10)]
CATCH_CLACK_DB = -18
# the hammer takes up its play just after the valve opens: delay, level over the air flow, clack
TAKE_UP_S, TAKE_UP_DB, TAKE_UP_CLACK_DB = .0125, 5.5, 0


def blows():
    """All hammer blows as (t/s, level/dB, clack/dB): take-up, stray catches, then even runs that fade."""
    take_up = [(on + TAKE_UP_S, db + surge_db + TAKE_UP_DB, TAKE_UP_CLACK_DB)
               for on, _, db, surge_db in TRIGGER_PULLS]
    catches = [(s, db, CATCH_CLACK_DB) for s, db in HAMMER_CATCHES]
    runs = []
    for first, last, count, db, clack_db in HAMMER_RUNS:
        for k, s in enumerate(np.linspace(first, last, round(count))):
            scatter_db = CLACK_SCATTER_DB * rng.standard_normal()
            runs.append((s, db - k * FADE_DB_PER_BLOW, clack_db + scatter_db))
    return sorted(take_up + catches + runs)


# spectrum of hammer on anvil: f/Hz, relative level/dB per Hz
ANVIL_SPECTRUM = [(40, -32.5), (300, -2.5), (1200, -3.5), (1800, -4), (2800, -4), (4100, -2.5),
                  (5500, -5.5), (7000, -3), (8700, 3.5), (11000, 5.5), (13000, -3.5), (15500, -15)]


def hammer(strikes, blow_db=-1, clack_db=-5, ring_db=-7):
    """Steel hammer on anvil: a crack passes into socket and wheel, then the recoil rings the steel again."""
    out = np.zeros(N)
    for s, db, middle_db in strikes:
        blow = crack(ANVIL_SPECTRUM, t60=0.02, tail_db=-21, tail_t60=0.043)
        clack = crack(CLACK_SPECTRUM, t60=0.011, tail_db=-17.5, tail_t60=.04)
        add(out, s, undb(db + blow_db) * blow)
        add(out, s, undb(db + middle_db + clack_db) * clack)
        add(out, s, undb(db + ring_db) * ring())
        for delay, bounce_db in SOCKET_BOUNCES:
            add(out, s + delay, undb(db + ring_db + bounce_db - 15.5) * ring())
    return out


# motor spinning free: t/s, nominal vane rate f/Hz, level/dB
FREE_SPIN = [(2.274, 211, -31), (2.32, 222.3, -30), (2.36, 224.2, -27.5), (2.428, 226.7, -26)]
# harmonics of the vane note: multiple of the vane rate, relative level/dB
VANE_HARMONICS = [(1, -11.5), (2, -2.5), (3, 2.5), (4, 5.5), (5, 1.5), (6, 2.5), (7, -19), (8, -19.5),
                  (9, -15), (10, -8), (11, -4), (12, -4.5)]


def free_run():
    """With no load the vanes sing a short, slightly rough note: a harmonic series on the vane rate."""
    s, hz, db = np.transpose(FREE_SPIN)
    turns = np.cumsum(np.interp(TIME, s, hz) * (1 + 0.016 * walk(400))) / SR
    live = (TIME > s[0]) & (TIME < s[-1])
    note = 0
    for multiple, harmonic_db in VANE_HARMONICS:
        phase = rng.uniform(0, np.pi)
        note = note + undb(harmonic_db) * np.sin(2 * np.pi * multiple * turns[live] + phase)
    out = np.zeros(N)
    out[live] = unit(note) * undb(np.interp(TIME[live], s, db))
    return out


# difference between the microphone ports: f/Hz, side filter level/dB
PORT_DIFFERENCE = [(40, -20.5), (200, -46.5), (700, -18), (2800, -21), (5500, -6), (9000, -6), (13500, -1)]


def ports(x):
    """Two close ports share the bass; the treble, scattered by the shaking tool, reaches each differently."""
    scatter = unit(np.tanh(2 * walk(900)))
    side = colour(x * scatter, PORT_DIFFERENCE)
    return np.array([x + side, x - side])


# colour of the garage: f/Hz, relative level/dB
GARAGE_SPECTRUM = [(60, -11), (200, 2), (1200, 1), (4200, -3), (6500, 1), (10000, -6), (15000, -4.5)]
# decay of the garage's long tail: f/Hz, t60/s
GARAGE_DECAY = [(100, 0.52), (2000, 1.106), (4200, 1.1), (8000, 0.65), (15000, 0.49)]


def garage(x, wet_db=-16, early_db=-15, early_t60=0.31, spread=0.22):
    """Quick dense echoes from floor and car body, then the long tail of hard walls: decaying noise."""
    t = TIME[:SR]
    f, frames, cells = signal.stft(rng.standard_normal((2, SR)), SR, nperseg=256)
    decay = np.exp(-np.log(1000) * frames / along(GARAGE_DECAY, f)[:, None])
    tail = signal.istft(cells * decay, SR)[1][:, :SR]
    early = rng.standard_normal((2, SR)) * np.exp(-np.log(1000) * t / early_t60)
    tail = undb(wet_db) * tail / np.linalg.norm(tail[0])
    early = undb(early_db) * early / np.linalg.norm(early[0])
    # the echoes build up over 3.9 ms
    echo = (tail + early) * np.minimum(t / 0.0039, 1)
    coloured = colour(x, GARAGE_SPECTRUM)[None]
    mid, side = signal.fftconvolve(coloured, echo, axes=1)[:, :N]
    return np.array([mid + spread * side, mid - spread * side])


def scene():
    """Wrench, socket, wheel, hand and leak in the garage, over the faint noise of the workshop."""
    valve, flow = throttle()
    strikes = blows()
    air = motor(valve, flow, strikes) + inrush(flow) + free_run()
    steel = hammer(strikes) + chatter(valve, flow, strikes)
    near = air + steel + socket() + leak() + whistles() + wheel_rumble() + hand()
    return ports(near + workshop()) + garage(near) + aftersound()


def record(dry):
    """The microphone thins the bass below 60 Hz, rounds the highest peaks and cuts the top."""
    top_hz = 15300
    bass_cut = signal.butter(2, 60, "high", fs=SR, output="sos")
    top_cut = signal.ellip(8, .2, 70, top_hz, fs=SR, output="sos")
    thin = signal.sosfilt(bass_cut, dry)
    return signal.sosfilt(top_cut, np.tanh(thin))


dry = scene()
out = record(dry)
inscribe(out)
```